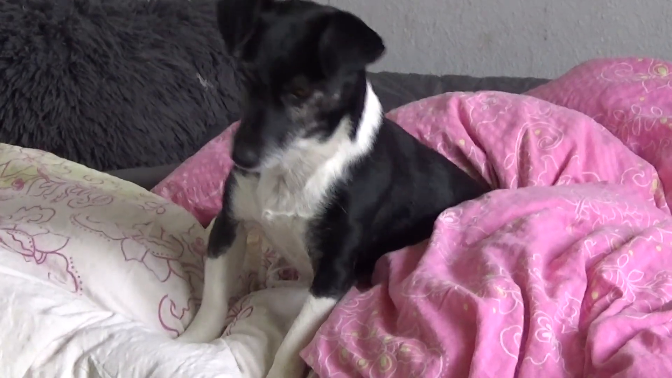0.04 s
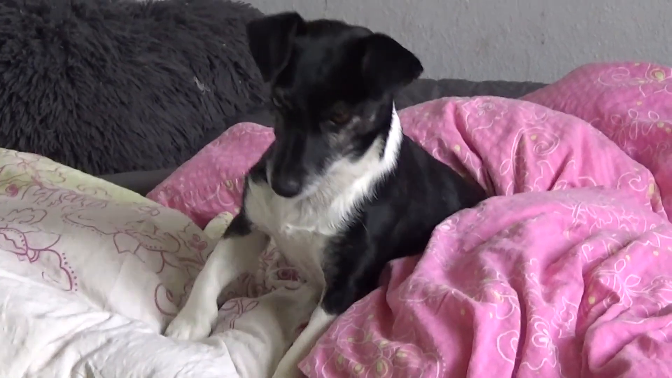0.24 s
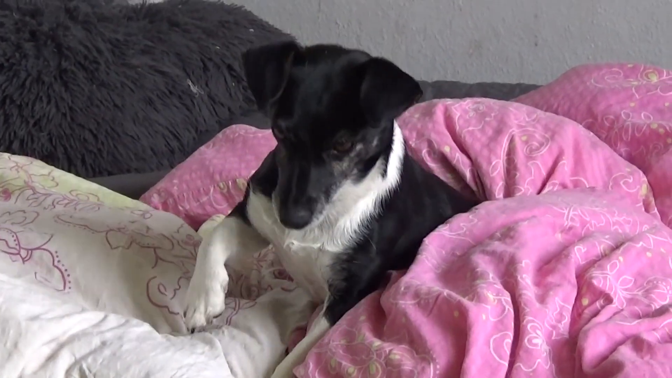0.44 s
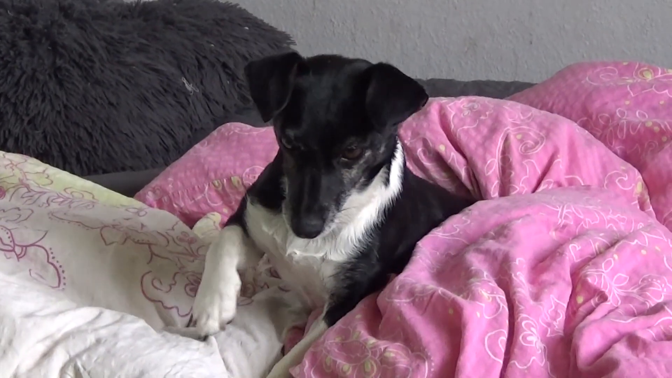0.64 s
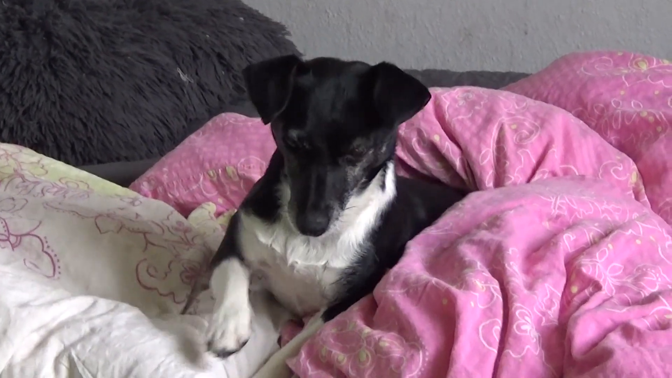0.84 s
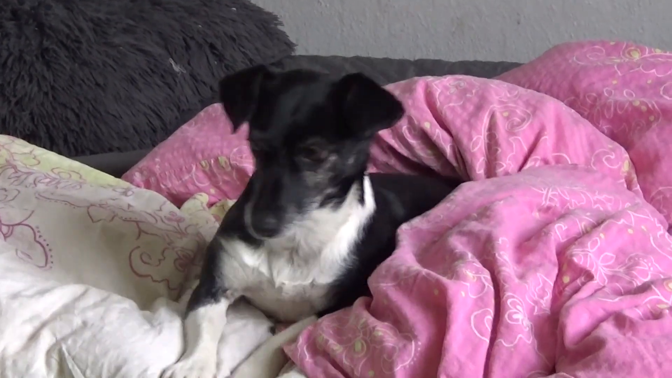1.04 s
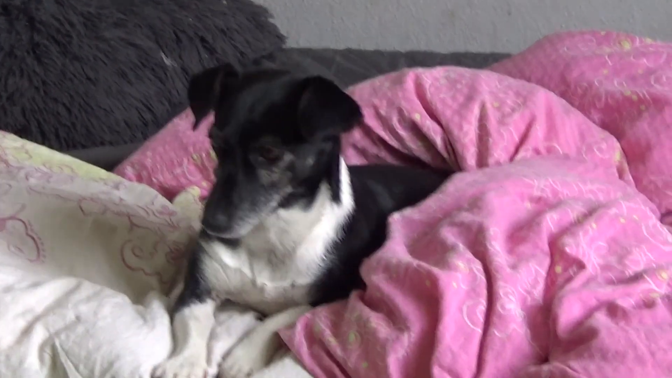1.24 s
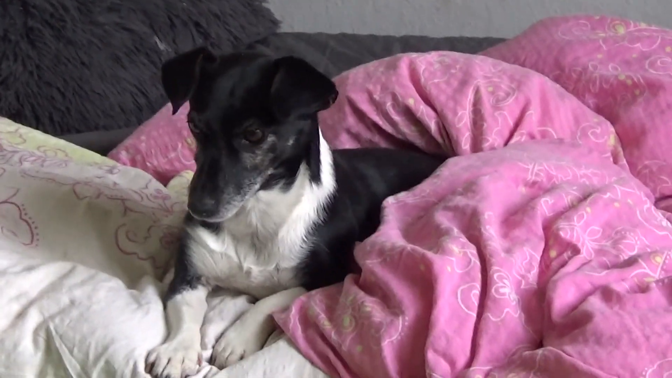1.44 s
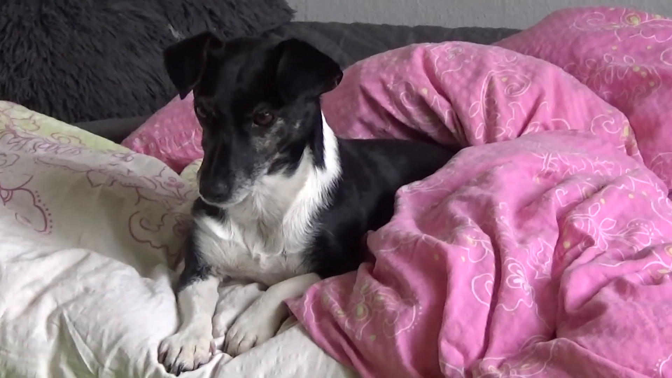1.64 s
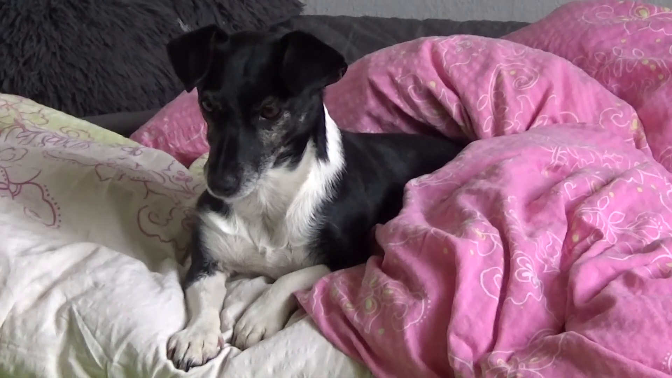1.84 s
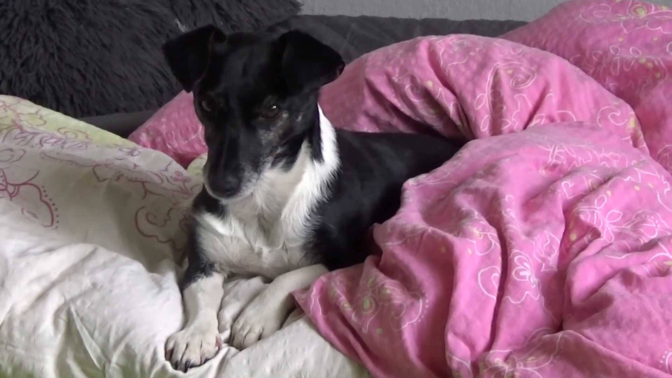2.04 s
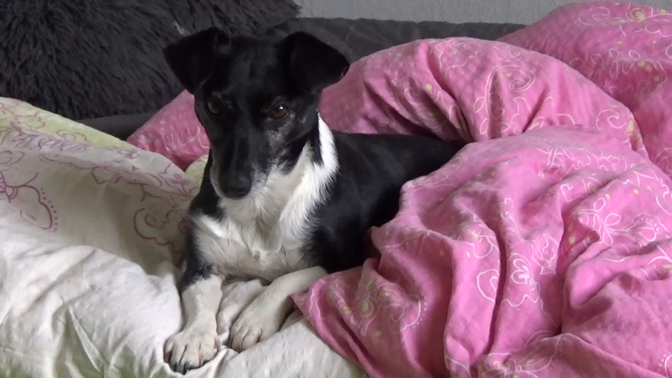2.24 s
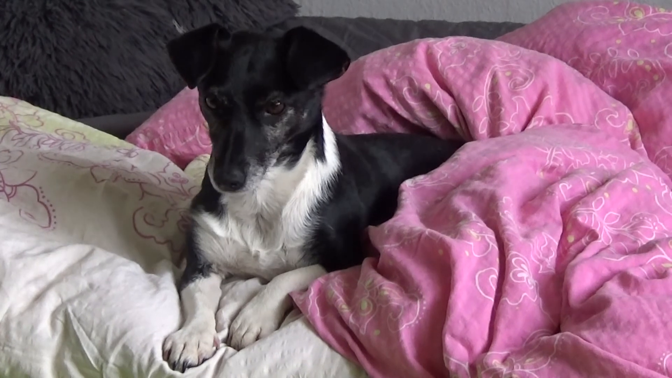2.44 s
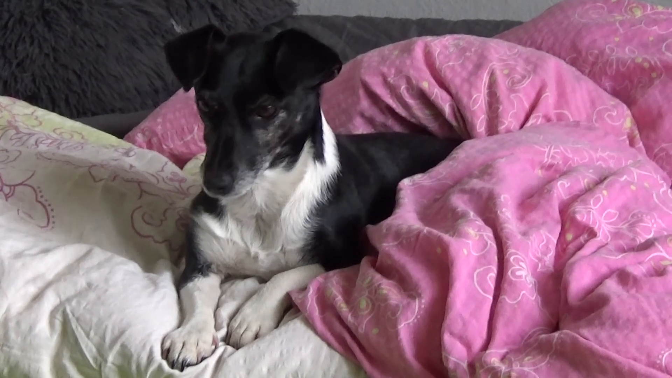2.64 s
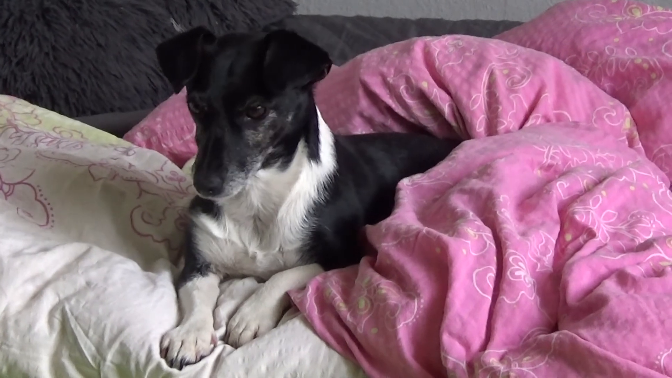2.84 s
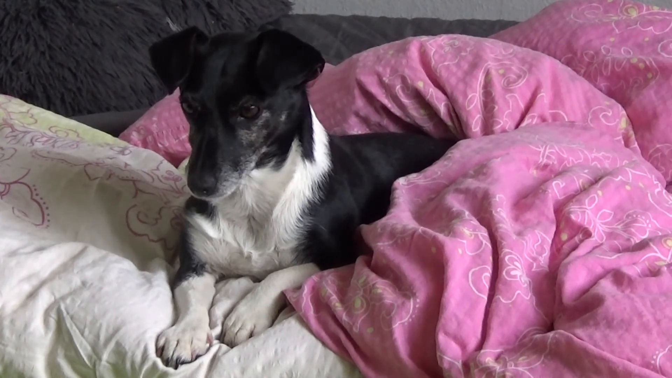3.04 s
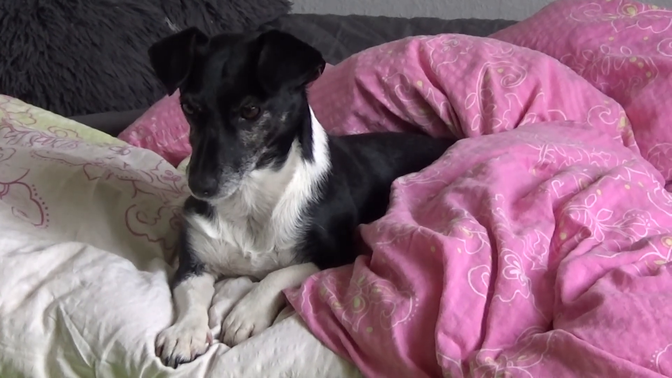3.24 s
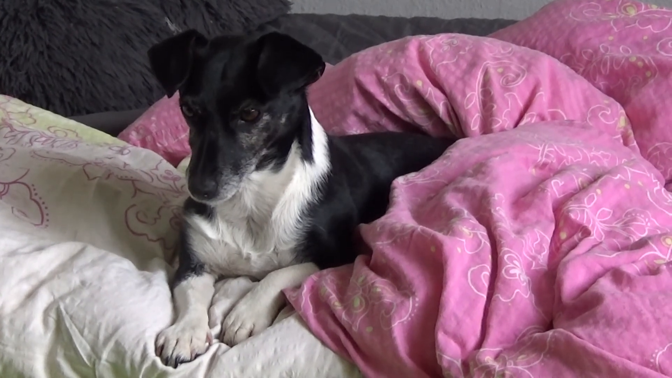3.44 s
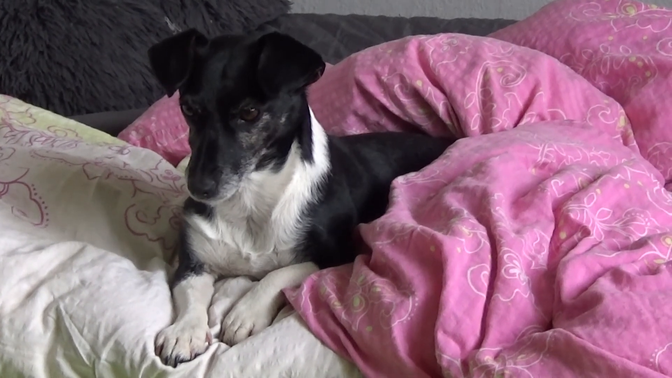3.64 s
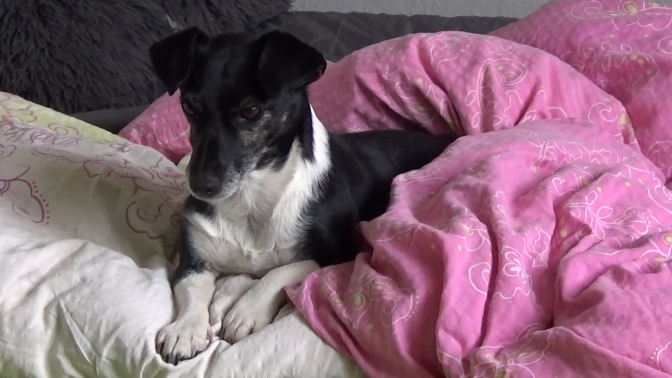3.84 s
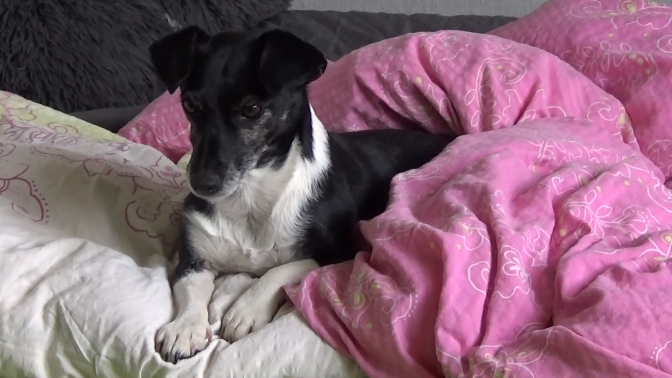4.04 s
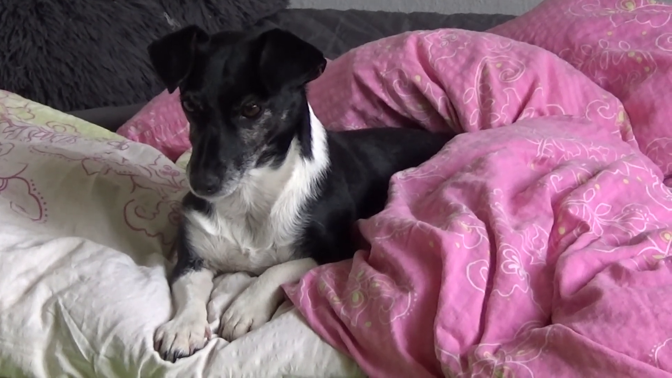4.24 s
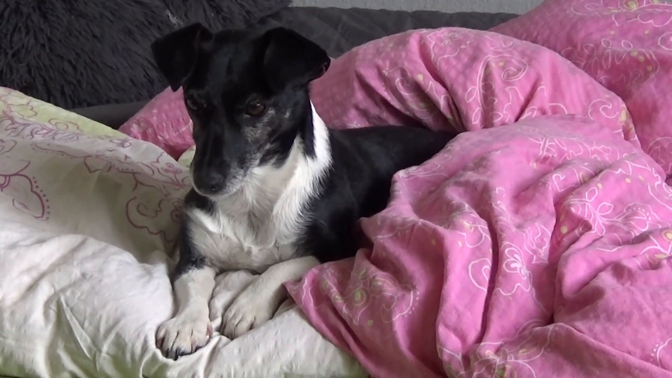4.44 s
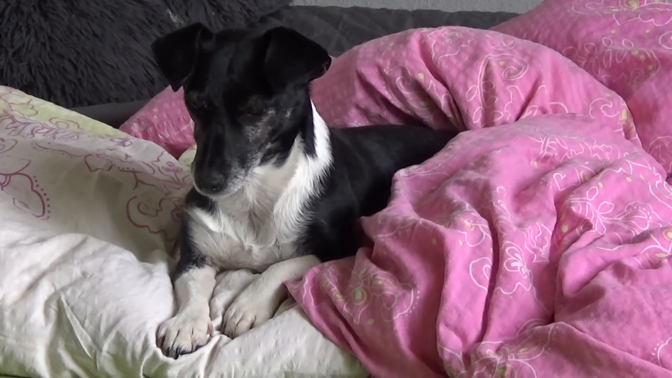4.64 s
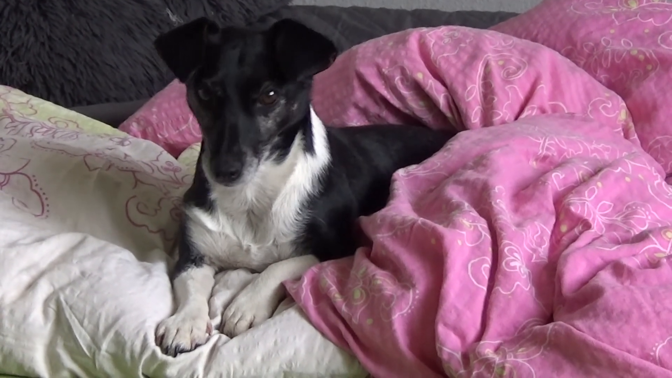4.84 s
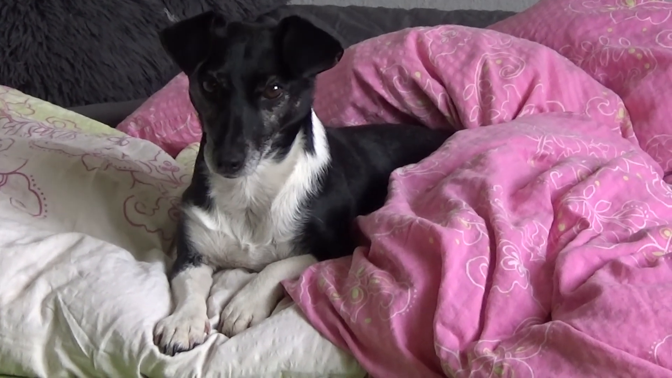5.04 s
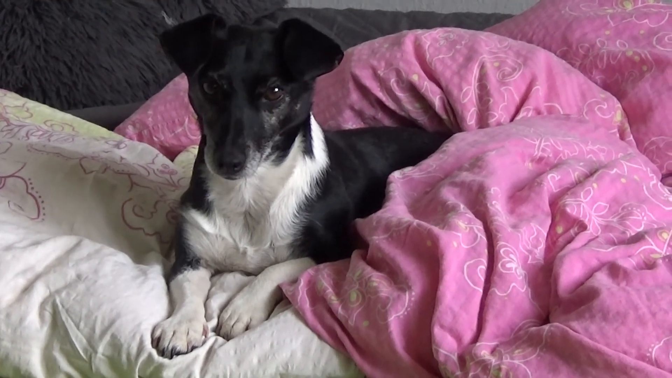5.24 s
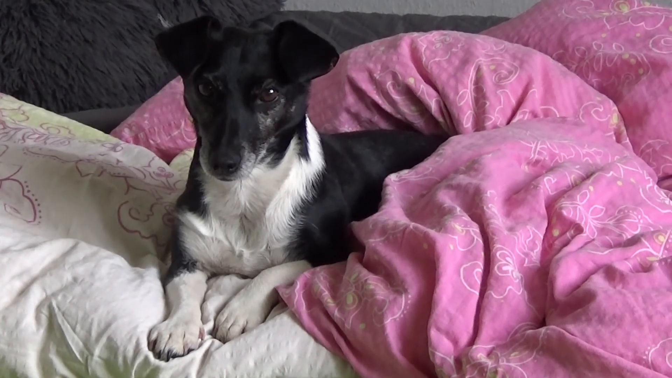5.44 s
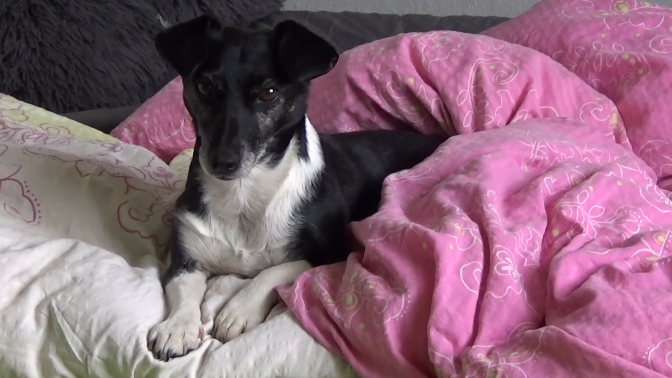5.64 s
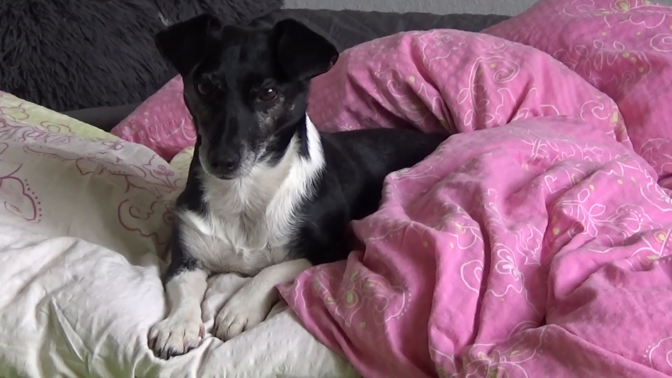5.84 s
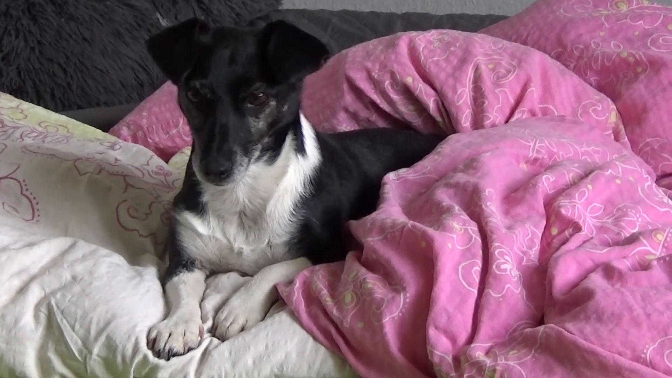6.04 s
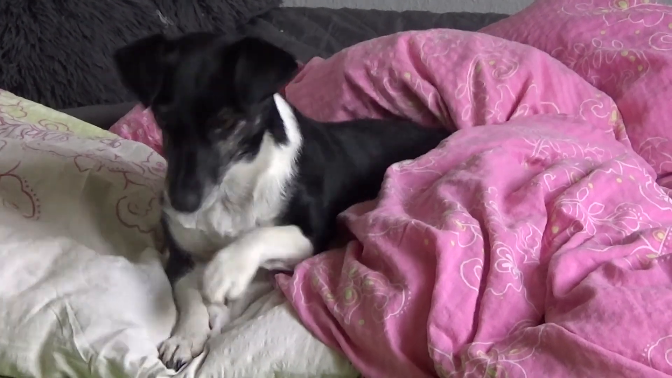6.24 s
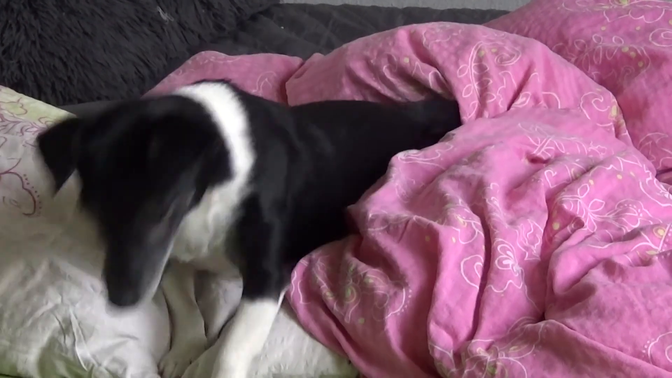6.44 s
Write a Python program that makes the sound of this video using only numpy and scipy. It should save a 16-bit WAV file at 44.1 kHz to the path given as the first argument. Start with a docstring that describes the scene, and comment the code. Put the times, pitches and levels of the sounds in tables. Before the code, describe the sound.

Close stereo sound of bedding indoors. Fabric rustles and rubs while paws sink dully and taut cloth pops in an even series; then things calm to slight slides and crisp little ticks. Another cluster of pops follows, then near stillness, one short rough squeak swooping downward with a small room tail, and a sudden bright sweep of cloth near the end. Soft hiss and faint rapid camera ticking stay underneath.

```python
"""A small dog treads about on a duvet and drops its weight on the mattress, heard close up in a quiet bedroom.
Countless tiny slips of cloth, coloured in different ways, make the filling crush, folds rub and the weave hiss.
Short decaying tones make taut cloth snap; one high squeak of two rough tones sounds through the room.
Near the end comes a fast sweep of bedding. Behind it all are soft air noise and a camera's faint ticking."""
import sys
import numpy as np
from scipy import signal
from scipy.fft import rfft, irfft, next_fast_len
from scipy.io import wavfile

SR = 44100
rng = np.random.default_rng(int(sys.argv[2]) if len(sys.argv) > 2 else 0)


def waveform_to_disk(signal):
    """Save audio, clipped to [-1, 1], as 16-bit WAV at the path in sys.argv[1]."""
    frames = np.transpose(np.atleast_2d(signal))
    scaled = np.clip(frames, -1, 1) * 32767
    samples = np.round(scaled).astype(np.int16)
    wavfile.write(sys.argv[1], SR, samples)


N = 287091
TIME = np.arange(N) / SR   # seconds

# Colour of folds rubbing. Each row: frequency in Hz, relative strength in dB.
FOLDS_COLOUR = [(40, -45), (150, -28), (350, -25), (520, 1), (800, 3.5), (1200, 3), (1900, -1), (2800, -7),
                (4500, -12), (10000, -31)]
# Colour of the hissing weave. Each row: frequency in Hz, relative strength in dB.
WEAVE_COLOUR = [(100, -35), (1200, -2.5), (2800, -0.5), (4200, -3), (6200, -3), (8000, 1), (9000, 2),
                (10500, -4), (13000, -11.5), (16000, -18)]
# How alike left and right are for sounds of cloth. Each row: frequency in Hz, likeness from 0 to 1.
CLOTH_LIKENESS = [(150, 1), (600, 0.95), (1400, 0.82), (4000, 0.53), (8000, 0.84), (14000, 1)]
# How alike left and right are for the room's echo. Each row: frequency in Hz, likeness from 0 to 1.
ECHO_LIKENESS = [(150, 1), (700, 0.97), (1500, 0.71), (3500, 0.44), (8000, 0.8), (14000, .95)]
# Paws sink into the duvet. Each row: time of the peak in seconds, level in dB, width of the bell in seconds.
PAW_STEPS = [(0.34, -48.5, 0.019), (0.575, -48.5, 0.022), (0.636, -50.5, 0.006), (2.32, -64, 0.0093),
             (3.54, -73, 0.085), (3.87, -85, 0.019)]
# Taut cloth snaps. Each row: start in seconds, relative level in dB, pitch in Hz,
# thud of the filling relative to the pop in dB.
CLOTH_SNAPS = [(.157, -37.5, 1140, -3), (0.2896, -39.5, 1340, 0), (.426, -40.5, 1360, -4),
               (.56, -35.5, 1460, -2), (.695, -29, 1630, -16), (0.8172, -25, 1710, -4),
               (.9418, -25.5, 1620, -4), (2.692, -44.5, 1000, 0), (2.7653, -30.5, 960, -2.5),
               (2.8356, -20.5, 1250, -7), (2.9097, -28, 1250, -5), (2.985, -27.5, 980, -2.5),
               (3.062, -35.5, 1120, -1), (3.146, -45.5, 1120, 1), (3.488, -44.5, 1110, -12)]


def from_db(db):
    """Turn decibels into a gain."""
    return 10 ** (np.asarray(db) / 20)


def rms_one(x):
    """Scale to an average strength (rms) of 1."""
    return x / np.sqrt(np.mean(x ** 2) + 1e-20)


def at_hz(points, hz):
    """Read a table between its rows, on a logarithmic frequency axis."""
    points = np.array(points)
    return np.interp(np.log(hz + 1), np.log(points[:, 0]), points[:, 1])


def pan(db):
    """Left and right gains; a positive level difference favours the left."""
    return from_db(np.array([[.5], [-.5]]) * db)


def together(gains):
    """Unrelated sounds add in power."""
    return np.sqrt(sum(gain ** 2 for gain in gains))


def stroke(start, hold, attack, release):
    """Rise, hold and fall; attack and release are the seconds taken for 20 dB."""
    below = np.maximum(start - TIME, 0) / attack + np.maximum(TIME - start - hold, 0) / release
    return from_db(-20 * np.minimum(below, 10))


def swells(rows):
    """Soft pushes, each rising and falling like a bell curve."""
    total = 0
    for peak_s, db, width_s in rows:
        distance = np.minimum(((TIME - peak_s) / width_s) ** 2, 60)
        total = total + from_db(db) * np.exp(-.5 * distance)
    return total


def drift(rate):
    """A smooth random curve of spread 1 that turns about rate times a second."""
    hz = np.arange(N // 2 + 1) * SR / N
    smooth = rfft(rng.standard_normal(N)) / (1 + (hz / rate) ** 2)
    return rms_one(irfft(smooth, N))


def colour(pair, spectrum, likeness):
    """Two unrelated signals become a stereo pair of given colour and left-right likeness, with rms 1."""
    size = next_fast_len(pair.shape[1])
    hz = np.arange(size // 2 + 1) * SR / size
    mid, side = rfft(pair, size) * from_db(at_hz(spectrum, hz))
    alike = np.clip(at_hz(likeness, hz), 0, 1)
    both = np.sqrt(1 + alike) * mid + np.sqrt(1 - alike) * side * [[1], [-1]]
    return rms_one(irfft(both, size)[:, :pair.shape[1]])


def slips(per_s, spread_db, clump_db):
    """Countless tiny slips of uneven size, coming in clumps as threads catch and let go."""
    sizes = from_db(spread_db * np.minimum(rng.exponential(1, N), 3))
    born = rng.random(N) < per_s / SR
    clumps = from_db(clump_db * np.clip(drift(34), -2, 2))
    return rng.standard_normal((2, N)) * born * sizes * clumps


def ring(age, hz, t60):
    """A tone struck at age 0 that fades by 60 dB in t60 seconds."""
    return np.sin(2 * np.pi * hz * age) * from_db(-60 * age / t60)


def resonate(x, modes):
    """The sound rings on in a few narrow resonances."""
    response = sum(from_db(db) / np.sqrt(t60) * ring(TIME[:SR // 2], hz, t60) for hz, db, t60 in modes)
    return signal.fftconvolve(x, response / np.sqrt(np.sum(response ** 2)))[:N]


def band(x, low_hz, high_hz):
    """Keep a band of frequencies, with a steeper cut at its top."""
    x = signal.sosfilt(signal.butter(2, low_hz, "high", fs=SR, output="sos"), x)
    return signal.sosfilt(signal.butter(4, min(high_hz, .45 * SR), fs=SR, output="sos"), x)


def bedroom(x, wet_db, early):
    """Close reflections from bed and wall, then a short diffuse tail, made from fading noise."""
    # Each row: frequency in Hz, relative strength in dB.
    echo_colour = [(60, -19), (250, -0.5), (600, 7), (1500, -0.5), (4000, 1), (9000, 4.5), (16000, -4)]
    room_t60_s, early_t60_s = 0.33, 0.07
    age = TIME[:SR // 2]
    arrival = np.clip((age - .002) / .005, 0, 1)
    fade = arrival * (from_db(-60 * age / room_t60_s) + early * from_db(-60 * age / early_t60_s))
    echo = colour(rng.standard_normal((2, len(age))), echo_colour, ECHO_LIKENESS) * fade
    echo /= np.sqrt(np.sum(echo ** 2) / 2)
    return from_db(wet_db) * signal.fftconvolve(x[None], echo, axes=1)[:, :N]


def bedding():
    """Slow shifting: the filling crushes dully, folds rub in grains, the weave hisses."""
    # The dog shifts. Each row: start in seconds, length in seconds, relative level in dB,
    # extra pressure on the folds in dB.
    dog_moves = [(0.102, 0.046, -55, -5), (0.247, 0.2, -59, 1), (0.492, 0.38, -56.5, -0.5),
                 (0.77, 0.16, -53.5, -4), (0.89, 0.013, -52, 0), (1.14, .08, -64, -9.5),
                 (1.355, 0.055, -62.5, -4), (2.56, 0.046, -63.5, -7.5), (2.697, 0.42, -62.5, 4),
                 (3.496, 0.075, -66, 3), (3.692, 0.13, -65.5, -1.5), (4.18, 0.067, -74, 4),
                 (4.463, 0.065, -72, 0), (5.16, 0.018, -75, 7.5), (6.154, 0.19, -69, 5),
                 (6.472, .06, -65.5, 3)]
    # Each row: frequency in Hz, relative strength in dB.
    filling_colour = [(30, -10), (60, -18), (100, -6.5), (160, -1.5), (240, 3.5), (370, 2.5), (520, 2),
                      (900, -13), (2000, -44)]
    filling_db = -6.5   # share of the pressure that reaches the filling
    attack_s, release_s = .11, 0.31
    step_crush_db, step_crush_release_s = -3, 0.32   # the filling goes on giving under each paw
    snap_rub_db, snap_rub_release_s = -28.5, 0.1   # folds slacken after each snap

    moves = []
    for start_s, length_s, db, pressure_db in dog_moves:
        moves.append((from_db(db) * stroke(start_s, length_s, attack_s, release_s), pressure_db))
    weave = together(gain for gain, _ in moves)
    pressed = together(gain * from_db(pressure_db) for gain, pressure_db in moves)
    trodden = together(from_db(db + step_crush_db) * stroke(s, 0, 0.038, step_crush_release_s)
                       for s, db, _ in PAW_STEPS)
    slackened = together(from_db(db + snap_rub_db) * stroke(s, 0, 0.017, snap_rub_release_s)
                         for s, db, *_ in CLOTH_SNAPS)
    filling = together([from_db(filling_db) * pressed, trodden])
    folds = together([pressed, slackened])

    lumps = slips(4000, 1.5, 3.0)
    grains = slips(5000, 2.3, 2.0)
    threads = slips(12000, 2.6, 1.5)
    crush = filling * colour(lumps, filling_colour, CLOTH_LIKENESS)
    rub = from_db(2.0) * folds * colour(grains, FOLDS_COLOUR, CLOTH_LIKENESS)
    hiss = from_db(2.5) * weave * colour(threads, WEAVE_COLOUR, CLOTH_LIKENESS)
    return crush + (rub + hiss) * pan(1.4)


def footfalls():
    """Paws give muffled puffs in the filling; the body's weight reaches the mattress below."""
    # The weight drops. Each row: time of the peak in seconds, level in dB, width of the bell in seconds.
    weight_drops = [(.805, -66, .018), (.925, -64, 0.027)]
    # Colours of paws and weight. Each row: frequency in Hz, relative strength in dB.
    paw_colour = [(40, -44), (80, 1), (140, -9.5), (220, 11.5), (320, -4.5), (500, -6), (1000, -28),
                  (2500, -55)]
    weight_colour = [(15, -12), (35, 9), (80, -3), (140, -18), (400, -55)]
    paws = swells(PAW_STEPS) * colour(rng.standard_normal((2, N)), paw_colour, CLOTH_LIKENESS)
    weight = swells(weight_drops) * colour(rng.standard_normal((2, N)), weight_colour, CLOTH_LIKENESS)
    return paws + weight


def snaps():
    """Cloth pulled taut pops for a few cycles, and the filling behind it answers with a thud."""
    out, age = np.zeros(N), TIME[:SR // 20]
    for start_s, db, hz, thud_db in CLOTH_SNAPS:
        thud_hz = 372 + 61 * start_s   # the thud gets higher as the filling is packed down
        pop = ring(age, hz, 6.5 / hz) + from_db(-3.5) * ring(age, 1780, 0.0023)
        pop = band(pop, 910, 3500)
        thud = from_db(thud_db) * band(ring(age, thud_hz, 0.0083), 0.61 * thud_hz, 1180)
        start = int(start_s * SR)
        out[start:start + len(age)] += from_db(db + 5.5) * (pop + thud)
    return out * pan(2.5) + bedroom(out, wet_db=-3.0, early=0.87)


def sweep():
    """One fast stroke of cloth over cloth: the slips merge into a bright swish above the heaving filling."""
    # Speed of the stroke. Each row: time in seconds, relative level in dB.
    stroke_speed = [(5.72, -82), (5.818, -53), (5.838, -41.5), (5.88, -39.5), (5.968, -30.5),
                    (6.048, -34.5), (6.15, -59.5), (6.2, -70)]
    # The filling heaves. Each row: time of the peak in seconds, relative level in dB.
    filling_heaves = [(5.856, -41), (5.945, -35.5), (6.035, -31.5)]
    # Colours of the heaving filling and the fast weave. Each row: frequency in Hz, relative strength in dB.
    heave_colour = [(40, -43), (90, -53), (130, -27), (175, 4.5), (260, -1), (410, 6.5), (560, 2.5),
                    (900, -3.5), (2000, -50)]
    fast_weave_colour = [(100, -54), (1200, -5), (2800, -1.5), (4200, -2), (6200, 0.5), (8500, 3.5),
                         (10500, -3), (13000, -12), (16000, -22)]
    # Low resonances of the room, stirred by the sweep.
    # Each row: frequency in Hz, relative level in dB, time to fade by 60 dB in seconds.
    room_modes = [(179, -8, .3), (358, -2, .35), (420, 0, .2), (556, -4, .25), (604, -5, .2), (770, -8, .2)]
    heave_attack_s, heave_release_s = 0.035, 0.12

    s, db = np.transpose(stroke_speed)
    during = np.clip(TIME, s[0], s[-1])
    speed = from_db(np.interp(during, s, db)) * stroke(s[0], s[-1] - s[0], .03, .06)
    bite = from_db(-10.5 + 16 * (during - s[0]))   # the folds bite harder, by 16 dB a second
    heave = together(from_db(heave_db) * stroke(at, 0, heave_attack_s, heave_release_s)
                     for at, heave_db in filling_heaves)
    crush = from_db(-5.0) * heave * colour(slips(5000, 0.7, 2.0), heave_colour, CLOTH_LIKENESS)
    rub = bite * speed * colour(slips(8000, 0.55, 0.67), FOLDS_COLOUR, CLOTH_LIKENESS)
    hiss = from_db(1.5) * speed * colour(slips(35000, 1.9, 0.42), fast_weave_colour, CLOTH_LIKENESS)
    boom = from_db(-18.5) * resonate(crush.mean(0), room_modes)
    return crush + boom + rub * pan(.8) + hiss * pan(1.7)


def squeal(hz, jitter, overtone_db):
    """A stick-slip tone (cloth catching and letting go) with unsteady pitch and strength, and two overtones."""
    phase = 2 * np.pi * np.cumsum(hz * (1 + jitter * drift(522))) / SR
    tone = sum(from_db(overtone_db * k) * np.sin((k + 1) * phase) for k in range(3))
    return rms_one(tone * from_db(0.9 * drift(420)))


def squeak_pitch(hover_hz, final_hz, waver_hz, start_s, swoop_s):
    """The pitch scoops up, wavers about its height, then sinks ever more slowly to its final value."""
    scoop = 52000 * np.clip(start_s - TIME, 0, .02)   # slides up at 52000 Hz a second as the cloth catches
    wavers_per_s, swoop_time_s = 20.3, .028
    waver = waver_hz * np.cos(2 * np.pi * wavers_per_s * (TIME - start_s))
    hover = hover_hz - scoop + waver
    return final_hz + (hover - final_hz) * np.exp(-np.maximum(TIME - swoop_s, 0) / swoop_time_s)


def squeak():
    """Two rough tones hover, then swoop down and swell; the room smears them into a short tail."""
    # Friction hiss around the squeak. Each row: frequency in Hz, relative strength in dB.
    friction_colour = [(300, -47), (1400, -7), (2000, -8), (4000, 13), (7000, -1), (9500, 2), (12000, -6),
                       (16000, -38)]
    start_s, swoop_s = 4.649, 4.703
    attack_s, release_s = 0.011, 0.031
    hover_db, swoop_db = -45, -29.5   # relative levels
    swell_delay_s, swell_hold_s = 0.0099, .015

    # The two tones are not locked together.
    lower_hz = squeak_pitch(4800, 1600, 342, start_s, swoop_s)
    upper_hz = squeak_pitch(5950, 2400, 110, start_s, swoop_s)
    hover = from_db(hover_db) * stroke(start_s, swoop_s - start_s, attack_s, release_s)
    swell = from_db(swoop_db) * stroke(swoop_s + swell_delay_s, swell_hold_s, attack_s, release_s)
    force = together([hover, swell])
    bright_db = -17 + 12 * np.log2(lower_hz / 5000)   # higher slips are sharper, with more overtone
    rasp = .02 * (6000 / upper_hz) ** 2   # the upper tone breaks up as it falls
    lower = squeal(lower_hz, jitter=0.0201, overtone_db=bright_db)
    upper = squeal(upper_hz, jitter=rasp, overtone_db=bright_db + 1)
    tones = force * (lower + from_db(-3.5) * upper)
    air = from_db(-14) * force * colour(slips(8000, 1.1, 1.5), friction_colour, ECHO_LIKENESS)
    echo = bedroom(tones + from_db(-1) * air[0], wet_db=-1.5, early=1.0)
    return (from_db(-4.5) * tones + air + echo) * pan(-2.5)


def paw_chirp():
    """A pad drags briefly over taut cloth, giving a short gliding tone."""
    # Each row: time of the peak in seconds, pitch at the peak in Hz, relative level in dB,
    # width of the bell in seconds, glide in octaves per second.
    chirps = [(0.661, 1258, -48, 0.004, 0), (0.789, 877, -42.5, .0065, -23)]
    tone = 0
    for peak_s, hz, db, width_s, glide in chirps:
        pitch_hz = hz * 2 ** (glide * np.clip(TIME - peak_s, -2 * width_s, 2 * width_s))
        tone = tone + swells([(peak_s, db, width_s)]) * squeal(pitch_hz, jitter=0.0283, overtone_db=-6)
    return tone * pan(10.0) + bedroom(tone, wet_db=-4.0, early=.8)


def slide():
    """Flat cloth glides over flat cloth with a fine, even hiss."""
    # Each row: frequency in Hz, relative strength in dB.
    slide_colour = [(40, -31), (150, -13), (400, -3.5), (1200, -0.5), (2200, -3), (4200, -3), (6500, -6),
                    (8000, -0.5), (9000, 3), (11000, -6.5), (16000, -17)]
    glide = from_db(-53.5) * stroke(start=2.199, hold=0.12, attack=0.044, release=0.26)
    return glide * colour(slips(20000, 1.0, 0.55), slide_colour, CLOTH_LIKENESS)


def ticks():
    """Single creases flick over, each a crisp burst of noise that starts at once and dies away."""
    # Each row: start in seconds, level in dB, time to fade by 60 dB in seconds.
    creases = [(2.194, -61, .03), (2.591, -50, 0.13), (2.604, -51, .08), (2.825, -54, 0.032),
               (3.415, -49, 0.022), (3.56, -53.5, 0.053), (3.581, -49, 0.036), (4.916, -53.5, 0.045),
               (5.277, -55.5, 0.023)]
    fade = 0
    for start_s, db, t60_s in creases:
        fade = fade + from_db(db - 60 * np.clip(TIME - start_s, 0, 1) / t60_s) * (TIME > start_s)
    return fade * colour(rng.standard_normal((2, N)), WEAVE_COLOUR, CLOTH_LIKENESS)


def background():
    """Still room air and microphone hiss as steady noise, with the camera's faint tick 25 times a second."""
    # Each row: frequency in Hz, relative strength in dB.
    air_colour = [(20, -15), (60, -16), (120, -10), (250, -4), (500, -1), (800, 1), (1300, -1.5),
                  (2500, -5.5), (5000, -7.5), (7500, -7.5), (9000, -6), (10500, -10), (15500, -14.5)]
    # Each row: frequency in Hz, left-right likeness from 0 to 1.
    air_likeness = [(100, .9), (300, 0.58), (900, 0.22), (3000, 0.58), (7000, 0.75), (14000, 1)]
    air = from_db(-65.1) * colour(rng.standard_normal((2, N)), air_colour, air_likeness)
    age = TIME % (1 / 25)   # seconds since the latest tick
    tick = from_db(-63 + 1.5 * drift(15)) * band(ring(age, 3520, .025), 2500, 6000)
    return air + tick


def scene():
    """Everything on and around the bed, added together."""
    dog = bedding() + footfalls() + snaps() + sweep()
    cloth = squeak() + paw_chirp() + slide() + ticks()
    return dog + cloth + background()


def record(dry):
    """Cut the treble steeply above 15750 Hz."""
    return signal.sosfilt(signal.ellip(12, .1, 70, 15750, fs=SR, output="sos"), dry)


dry = scene()
out = record(dry)
waveform_to_disk(out)
```